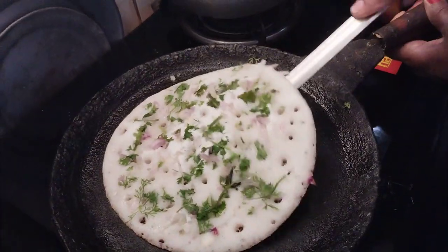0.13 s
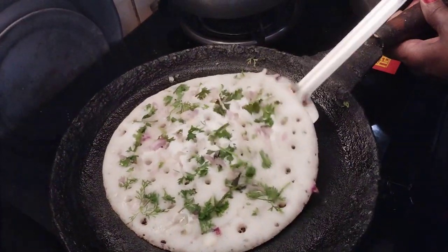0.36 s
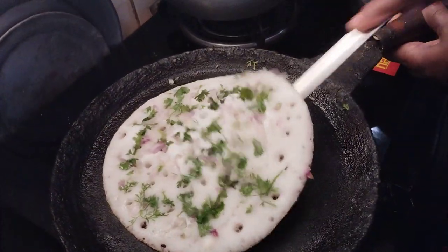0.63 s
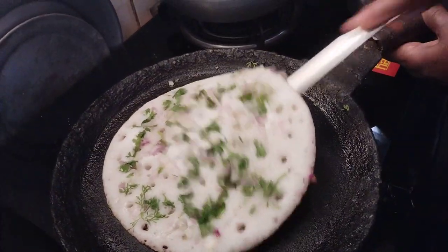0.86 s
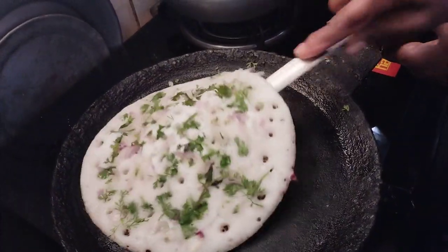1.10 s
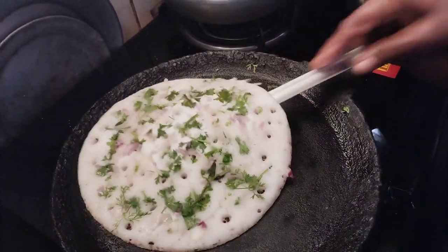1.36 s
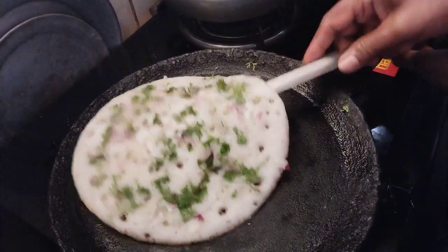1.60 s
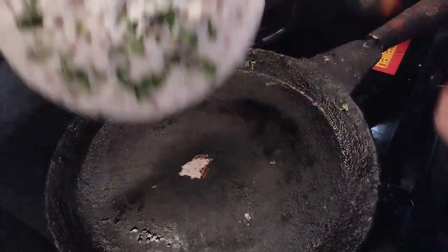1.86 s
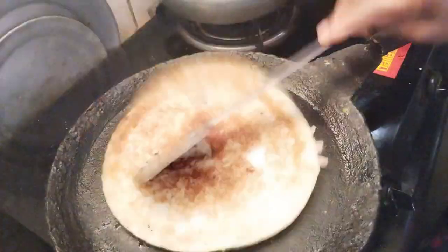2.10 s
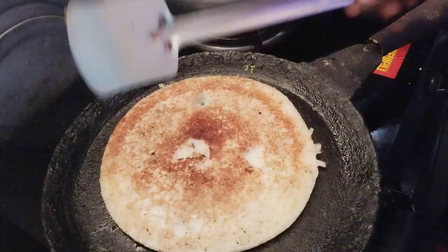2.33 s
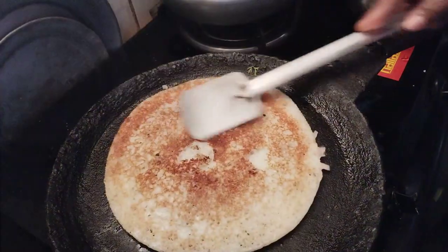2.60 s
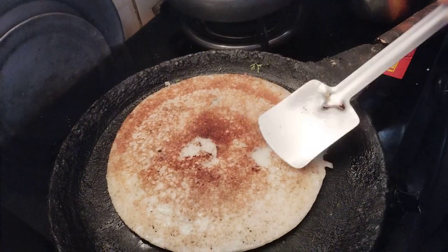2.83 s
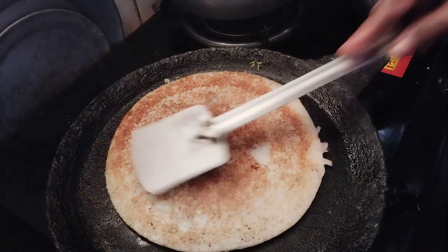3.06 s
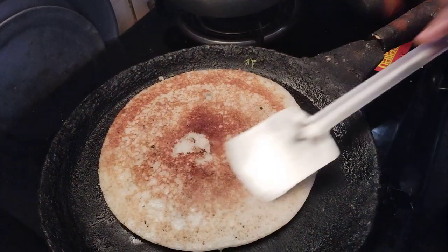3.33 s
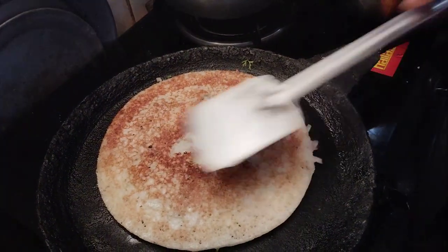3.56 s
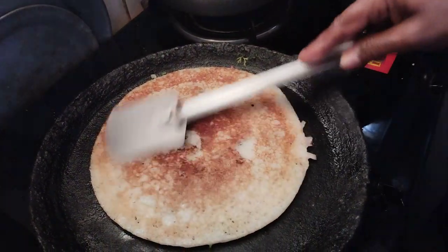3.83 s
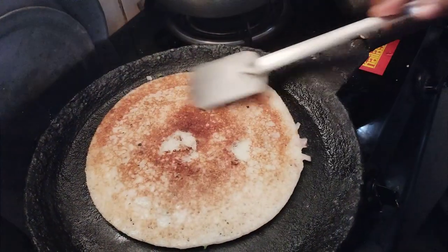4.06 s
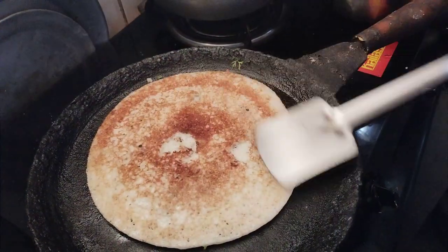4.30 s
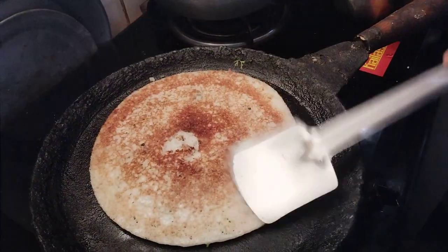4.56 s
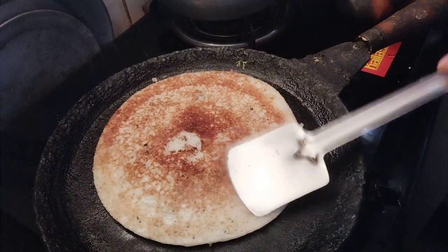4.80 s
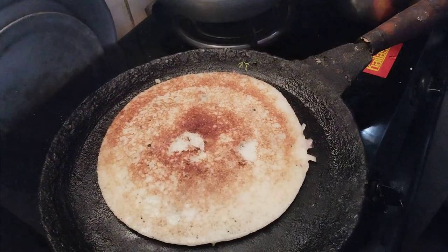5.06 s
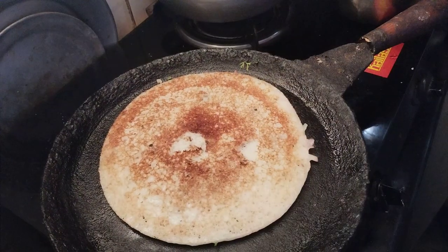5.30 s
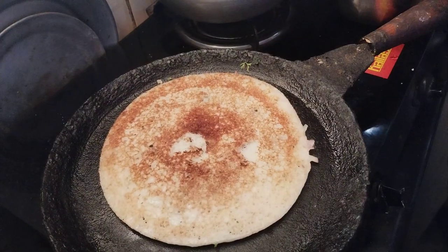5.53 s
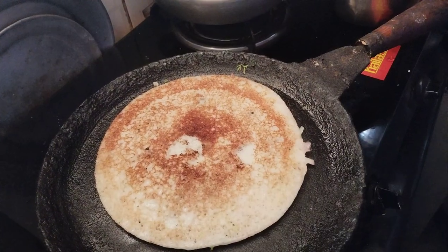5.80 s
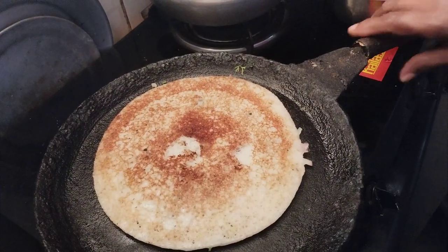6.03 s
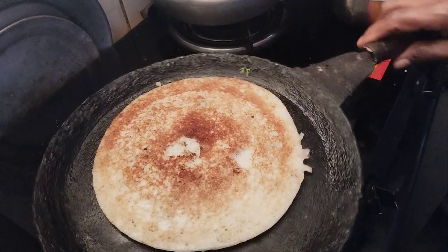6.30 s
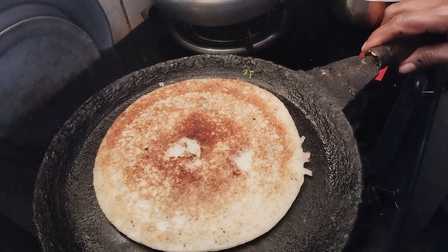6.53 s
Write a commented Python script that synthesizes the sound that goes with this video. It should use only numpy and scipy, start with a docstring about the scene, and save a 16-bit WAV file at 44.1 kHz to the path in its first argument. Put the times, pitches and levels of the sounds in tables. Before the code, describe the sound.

A metal spatula scrapes under a flatbread on an iron griddle, the bread slaps over and sizzles, then a clatter and short squeak.

```python
"""A spatula scrapes under a flatbread on a hot iron griddle (grit-driven modes) while fat spits (noise bursts)
and someone pounds steadily in a far room (ringing wall modes) over the low rumble of the kitchen (noise).
The bread is flipped: its wet side slaps down and starts to fry (hiss, fizz and crackle).
The spatula is then dropped on the counter (struck modes), and last the griddle squeaks as it is dragged
on the burner (a stick-slip tone with overtones)."""
import sys
import numpy as np
from scipy import signal
from scipy.fft import rfft, irfft
from scipy.io import wavfile

SR = 44100
rng = np.random.default_rng(int(sys.argv[2]) if len(sys.argv) > 2 else 0)


def wav_out(sig):
    """Save sig, one row per channel (or a flat mono array), as 16-bit PCM at SR to the path in sys.argv[1]."""
    wavfile.write(sys.argv[1], SR, np.round(np.clip(np.atleast_2d(sig).T, -1, 1) * 32767).astype(np.int16))


def how_loud(loudness_db):
    """Turn decibels into a plain amplitude multiplier (0 dB gives 1, 20 dB gives 10)."""
    steps = np.asarray(loudness_db, float) / 20
    return 10 ** steps


N = 293265
TIME_S = np.arange(N) / SR

# spectrum of the kitchen rumble: frequency_hz, density_db (per Hz)
RUMBLE_SPECTRUM = [(65, -29), (110, 1.5), (150, -18), (242, -4), (325, -8.5), (537, -9), (666, -13.5),
                   (1440, -10.5), (1710, -33), (1900, -31), (2470, -64), (4180, -120)]
# low swells of the house: centre_hz, width_hz, level_db (rms)
HOUSE_SWELLS = [(25.5, 6.8, -57), (48, 8.7, -53.5), (80, 19, -55.5), (205, 11, -66.5)]
RUMBLE_DB = -59  # rms

# far pounding: start_s, drive_db (relative)
POUNDS = [(0.305, -35), (0.721, -37.5), (1.14, -38.5), (1.578, -39.5), (2.012, -41), (2.515, -45.5),
          (2.954, -38.5), (3.395, -38), (3.853, -37), (4.286, -38.5), (4.73, -36), (5.161, -38.5),
          (5.597, -37.5), (6.058, -37), (6.495, -37)]
# modes of the wall: pitch_hz, gain_db, t60_s
WALL_MODES = [(244, 0.5, 0.069), (80, -5.5, 0.16), (341.3, -15, 0.27), (205, -18, 0.35)]

# soft low bumps, and the low ticks of two strong spits (2.358, 2.4414):
# start_s, level_db, pitch_hz, swell_s, t60_s
LOW_BUMPS = [(0.223, -23.5, 371, 0.011, 0.14), (1.21, -34.5, 403, 0.0068, 0.094),
             (1.25, -42, 395, .01, 0.21), (1.25, -44, 630, 0.013, .25), (2.169, -29, 210, .01, 0.44),
             (2.168, -29, 80, .004, 0.1), (2.17, -21, 643, 0.0017, 0.14),
             (2.358, -30, 403, 0.00051, 0.0081), (2.4414, -23, 450, 0.00027, 0.0064),
             (4.002, -38.5, 279, 0.012, 0.35), (4.053, -31, 297, 0.0024, 0.078),
             (4.099, -40, 205, 0.018, 0.36)]

# the griddle is dragged: time_s, squeak_db, overtone_db, rub_db
DRAG_CURVE = [(6.269, -85, -54, -54), (6.304, -30, -53, -44.5), (6.338, -26.5, -27, -44),
              (6.386, -22.5, -39, -38.5), (6.414, -26.5, -35.5, -43), (6.488, -28.5, -42, -48.5),
              (6.496, -34, -63, -53), (6.56, -58, -65, -55)]
# overtones of the squeak: multiple, level_db (against overtone_db)
SQUEAK_OVERTONES = [(2, -4.5), (3, -4), (4, 1), (5, -5), (6, -10), (7, -10)]
# spectrum of the griddle's rub on the burner: frequency_hz, density_db (per Hz)
RUB_SPECTRUM = [(88, -41), (150, -21), (247, -1), (325, -3.5), (661, -5), (963, -17), (1700, -28),
                (2210, -40), (3740, -120)]
# the pitch starts SQUEAK_START_HZ above SQUEAK_HZ and settles
SQUEAK_HZ, SQUEAK_START_HZ, SQUEAK_SETTLE_S = 1877, 35, 0.0297
OVERTONE_FADE_DB_PER_S = 12  # times the multiple: high overtones die first

# blows of the spatula, edge first, then flat with bounces: start_s, rattle_db, fall_db_per_s, click_db
SPATULA_BLOWS = [(5.471, -12, 424, 1.5), (5.675, -4.5, 520, 12), (5.721, -11.5, 300, 0.0),
                 (5.758, -22, 300, -10), (5.775, -21.5, 300, 2), (5.82, -25.5, 280, -4)]
# spatula modes: pitch_hz, width_hz, edge_db (edge touches first), flat_db (falls flat)
SPATULA_MODES = [(357, 92, -14, -20), (864, 96, 0, -6), (1840, 95, 1, -8), (2350, 63, -6, -24),
                 (3520, 90, -4, -7.5), (5070, 110, 5, -2), (6540, 110, -20, -7), (6490, 84, -10, 3),
                 (6700, 27, -14, -8), (7280, 38, 5, -1), (8060, 97, -3, 1.5), (8050, 45, -10, -1),
                 (8500, 69, -3, -1), (9100, 63, -17, -9), (9360, 110, -12, -5), (10270, 64, 3, -30),
                 (10200, 67, -5, -19), (11270, 150, 2.5, -4.5), (12700, 100, -2, -17), (12700, 60, -18, -4)]
# spectrum of the struck counter: frequency_hz, density_db (per Hz)
COUNTER_SPECTRUM = [(88, -46), (150, -17.5), (361, -5), (504, -10), (888, -8.5), (1630, -14), (2270, 2),
                    (2810, -10), (3490, -6.5), (8400, -2.5), (16000, -14.5)]
RATTLE_RISE_S, RATTLE_TAIL_DB, TAIL_FALL_DB_PER_S = 0.0012, -15.5, 140  # the slower tail of each rattle

# spectrum of the bread's slap: frequency_hz, density_db (per Hz)
SLAP_SPECTRUM = [(47, -44), (80, -1), (216, -1.5), (551, -3.5), (636, -9), (746, -9), (912, -1.5),
                 (2500, -15), (3250, -24), (5500, -120)]
SLAP_S, SLAP_DB, SLAP_HOLD_S, SLAP_FALL_DB_PER_S = 2.162, -27, 0.012, 194

# the clearest fat spits: start_s, strength_db (relative), deep_db (lower band against treble)
CLEAR_SPITS = [(0.0832, -19.5, 2.5), (0.4385, -29, -8), (0.1312, -15.5, 0), (0.7081, -16.5, -10),
               (0.767, -16.5, 0.5), (0.8678, -26, -6), (1.0834, -23, -15), (1.2456, -28, -2),
               (1.2733, -25, 1), (1.3705, -15.5, -0.5), (1.5138, -26.5, 0), (1.5656, -21, 0),
               (1.6545, -32, -6), (1.7047, -20, -2), (1.7425, -26, -10), (1.7774, -11.5, -10),
               (1.8665, -26, -12), (1.882, -30, -6), (1.9477, -25, -2.5), (1.9906, -22, -11),
               (2.0964, -28.5, -8), (2.1699, 6, 0), (2.2168, -5, -12), (2.232, -6, -10), (2.2587, -17, -11),
               (2.292, -11, 7), (2.3531, 0.5, -8), (2.3585, 0, -23), (2.4422, -0.5, -9), (2.4926, -18, -2),
               (2.537, -15.5, 2.5), (2.6386, -10, 1), (2.8831, -8, 1), (2.9942, -15, -2.5),
               (3.2761, -6, 0.5), (3.306, -13.5, 6), (3.545, -10, -10), (3.6283, -6.5, -10),
               (3.7239, -11, -14), (4.0228, -13, 2), (4.2176, -6.5, -12), (4.579, -10, -12),
               (4.7659, -11, -5), (4.8757, -5.5, -14), (5.0028, -10.5, -5), (5.1094, -20, 0),
               (5.4364, -13, -14), (6.099, -7.5, -3), (6.576, -18, -0.5), (6.6079, -13, -5),
               (6.643, -12, -6)]
CRACK_DB, CRACK_T60_S = -3.0, 0.0029  # crack against the spit's strength
# spray of a 0 dB spit, and the share of the spit's dB that it follows
SPRAY_DB, SPRAY_FOLLOWS, SPRAY_T60_S = -21.5, 0.62, 0.12
SMALL_SPITS, SMALL_OVER_FRY_DB, SMALL_SPREAD_DB = 30, 10, 5  # count, then strength
SMALL_DEEP_DB, SMALL_DEEP_SPREAD_DB = -8, 6.4

# crackle bands, tinted by the microphone: centre_hz, width_hz, level_db
CRACKLE_BANDS = [(2520, 590, -1.5), (4180, 3000, -7), (5720, 910, 1), (7900, 700, -6.5), (11300, 2100, 0),
                 (14000, 2300, -4)]
# vigour of the frying, which fades as the bread is lifted, flares as the wet side lands, then settles:
# time_s, level_db (relative), top_db (top octave against the rest)
FRY_CURVE = [(0, -43.5, -1), (1.0, -45.5, 5), (1.54, -50, 3), (2.159, -57, 8), (2.162, -21, -7),
             (2.168, -12.5, -9), (2.195, -25.5, 7), (2.24, -25.5, 9), (2.29, -20.5, 0.5), (2.36, -25.5, 5),
             (2.385, -29, 4), (2.44, -30, 2.5), (2.56, -26.5, 0), (2.77, -26.5, 0), (3.99, -28.5, -0.5),
             (4.8, -27.5, 1), (5.14, -31, 0.5), (5.46, -31.5, -1), (6.65, -33, 0.5)]
# spectrum of hiss and fizz: frequency_hz, density_db (per Hz)
FRY_SPECTRUM = [(530, -24.5), (900, -15.5), (1240, -14.5), (1370, -15.5), (1540, -10), (1720, -9),
                (2340, 1), (3320, -8.5), (5820, -4), (6880, -7), (8530, 0.5), (15700, -17)]
# the sizzle dips briefly: start_s, end_s, change_db
FRY_DIP = (2.45, 2.531, -12.0)

# blade strokes over the iron: peak_s, swell_s, fade_s, peak_db (relative),
# low_ring_db (against peak), dull_rub_db (against peak)
BLADE_STROKES = [(0.016, 0.092, 0.12, -33, -9, -5.5), (0.16, 0.084, 0.15, -27, -2, -8),
                 (0.325, 0.032, 0.11, -28, -6, -13), (0.512, 0.057, .11, -24, 2, -13),
                 (0.588, 0.049, 0.064, -26, -4.5, -14), (0.679, 0.057, 0.07, -28.5, -0.5, -18),
                 (0.81, 0.079, .05, -35.5, -1.5, -20), (0.94, 0.072, .08, -23.5, -1.5, -17),
                 (0.994, 0.096, 0.075, -18, -14, -35), (1.08, 0.067, 0.15, -39, -14, -19),
                 (1.27, 0.14, 0.098, -42, 0.5, -16), (1.45, 0.061, 0.059, -40.5, -7, -28)]
# modes of griddle and blade when scraped: pitch_hz, width_hz, level_db
GRIDDLE_MODES = [(644, 12, 1.5), (920, 18, -6.5), (1278, 25, -8.5), (1450, 53, -4), (2037, 33, -13),
                 (2420, 46, -4), (2520, 51, -8), (3800, 49, -10), (4670, 540, -8.5), (5350, 61, -5),
                 (7050, 64, -17), (7840, 68, -3.5), (8290, 160, -1), (9000, 72, -7), (9000, 57, -6.5),
                 (9800, 54, -5.5), (11500, 400, -8)]
# spectrum of the blade's rasp: frequency_hz, density_db (per Hz)
RASP_SPECTRUM = [(88, -52), (150, -22), (524, -19), (637, -11.5), (837, -8), (941, 4), (1140, -4.5),
                 (2550, -2), (4000, -15), (8070, -5), (16000, -13)]
# the blade sings on one mode: start_s, length_s, pitch_hz, level_db (rms before the swell)
BLADE_SINGS = [(0.48, 0.17, 2520, -44), (0.905, 0.11, 2520, -27), (0.928, 0.14, 1450, -31.5),
               (0.971, 0.031, 5350, -21), (0.977, 0.068, 8300, -30), (.98, 0.044, 8950, -26),
               (0.962, 0.074, 3800, -32.5), (1.033, 0.13, 1104, -45), (1.1, 0.29, 2510, -61),
               (1.358, .16, 4280, -52)]
# fall from the peak after one swell or fade time, power of the slope
STROKE_EDGE_DB, STROKE_ROUNDNESS = 22, 1.3
RING_DB = -0.5  # high modes against rasp


def rms_one(x):
    """Normalisation: scaling a signal to unit rms."""
    return x / np.sqrt(np.mean(x ** 2) + 1e-20)


def in_time(rows):
    """Linear interpolation: the columns of a curve table, one value a sample."""
    s, *columns = np.transpose(rows)
    return [np.interp(TIME_S, s, column) for column in columns]


def colour(x, points):
    """Minimum phase: a folded cepstrum gives the causal filter that follows a spectrum table."""
    hz, db = np.transpose(points)
    grid_hz = np.maximum(np.arange(4097) * SR / 8192, 1)
    gain_db = np.interp(np.log(grid_hz), np.log(hz), db)
    cepstrum = irfft(np.log(how_loud(gain_db)))
    cepstrum[1:4096] *= 2
    cepstrum[4097:] = 0
    impulse = irfft(np.exp(rfft(cepstrum)))
    return signal.fftconvolve(x, impulse)[:N]


def drift(rate_hz):
    """Low-passed noise: a slow random wander of spread 1."""
    r = np.exp(-40 * np.pi * rate_hz / SR)  # runs at one value per 20 samples
    white = rng.standard_normal(N // 20 + 3002)
    slow = signal.lfilter([1], [1, -2 * r, r * r], white)[3000:]  # the start-up is cut off
    return np.interp(np.arange(N) / 20, np.arange(len(slow)), rms_one(slow - slow.mean()))


def resonance(x, hz, width_hz):
    """Damped oscillator: a two-pole band with gain 1 on top."""
    r = np.exp(-np.pi * width_hz / SR)
    poles = [1, -2 * r * np.cos(2 * np.pi * hz / SR), r * r]
    return signal.lfilter([(1 - r * r) / 2, 0, (r * r - 1) / 2], poles, x + 1e-18)


def ring(clicks, hz, t60_s):
    """Free decay: a unit click sets a decaying sine ringing."""
    r = how_loud(-60 / (t60_s * SR))
    w = 2 * np.pi * hz / SR
    return signal.lfilter([0, np.sin(w)], [1, -2 * r * np.cos(w), r * r], clicks + 1e-18)


def grains(per_s, spread_db):
    """Poisson-like impacts: random clicks of uneven size and sign, scaled to rms 1."""
    excess = np.minimum(rng.exponential(1, N), 5)
    sizes = how_loud(spread_db * excess) * rng.choice([-1, 1], N)
    return rms_one(sizes * (rng.random(N) < per_s / SR))


def body(x, modes, wander_db):
    """Modal superposition: the shifting contact point changes how strongly each mode is driven."""
    total = 0
    for k, (hz, width_hz, db) in enumerate(modes):
        drive = (-1) ** k * how_loud(db + wander_db * drift(5.5))
        total = total + drive * resonance(x, hz, width_hz) / np.sqrt(width_hz)
    return total


def rumble():
    """Filtered noise: broad room noise with a few narrow low swells."""
    white = rng.standard_normal((2, N))
    out = how_loud(RUMBLE_DB) * rms_one(colour(white[0], RUMBLE_SPECTRUM))
    for hz, width_hz, db in HOUSE_SWELLS:
        narrow = resonance(white[1], hz, width_hz)
        out += how_loud(db) * rms_one(resonance(narrow, hz, 2 * width_hz))
    return out


def pounding():
    """Transmission through a wall: blows alike but for level, low-passed, set the wall modes ringing."""
    clicks = np.zeros(N)
    for s, db in POUNDS:
        clicks[round(s * SR)] = -how_loud(db + 5.0)
    soft = signal.sosfilt(signal.butter(4, 420, fs=SR, output="sos"), clicks)
    return sum(how_loud(db) * ring(soft, hz, t60_s) for hz, db, t60_s in WALL_MODES)


def kitchen(x, t60_s=0.19):
    """Diffuse reverberation: decaying noise gives the dulled echo of the small hard room."""
    t = np.arange(round(0.5 * SR)) / SR
    tail = rng.standard_normal(len(t)) * how_loud(-60 * t / t60_s) * (t > 0.004)
    tail = signal.lfilter([1, 0.6], [1], tail)
    return signal.fftconvolve(x, tail / np.sqrt(np.sum(tail ** 2)))[:N]


def bumps():
    """Damped oscillation: a low ring swells for a moment and decays exponentially."""
    out = np.zeros(N)
    t = np.arange(SR) / SR
    for s, db, hz, swell_s, t60_s in LOW_BUMPS:
        i = round(s * SR)
        envelope = (1 - np.exp(-t / swell_s)) * how_loud(db - 60 * t / t60_s)
        tone = np.sin(2 * np.pi * (hz * t + rng.random()))
        out[i:i + SR] += (envelope * tone)[:N - i]
    return out


def drag():
    """Stick-slip friction locks onto one mode: a rough tone with overtones, on a rub that stirs the griddle."""
    start_s, end_s = DRAG_CURVE[0][0], DRAG_CURVE[-1][0]
    before = [(start_s - 0.03, -100, -100, -100)]
    after = [(end_s + 0.04, -100, -100, -100)]
    squeak_db, overtone_db, rub_db = in_time(before + list(DRAG_CURVE) + after)
    settling = np.exp(-np.maximum(TIME_S - start_s, 0) / SQUEAK_SETTLE_S)
    hz = SQUEAK_HZ + SQUEAK_START_HZ * settling
    phase = 2 * np.pi * np.cumsum(hz + 7 * drift(60)) / SR
    tone = np.sqrt(2) * how_loud(1.5 * drift(70)) * np.sin(phase)
    fading_db = OVERTONE_FADE_DB_PER_S * np.clip(TIME_S - DRAG_CURVE[2][0], 0, 1)
    overtones = np.zeros(N)
    for k, db in SQUEAK_OVERTONES:
        level = how_loud(db - k * fading_db + 4.5 * drift(60))
        overtones += np.sqrt(2) * level * np.sin(k * phase + 0.6 * drift(150))
    grit = grains(5000, spread_db=2.5)
    # two more griddle modes, shaken by the grit of the rub
    side = how_loud(2.5) * rms_one(resonance(grit, 2130, 220)) + how_loud(1.5) * rms_one(resonance(grit, 7970, 80))
    rub = rms_one(colour(grit, RUB_SPECTRUM))
    return how_loud(squeak_db) * tone + how_loud(overtone_db) * (overtones + side) + how_loud(rub_db) * rub


def clatter():
    """Impact excitation: hard blows and the rattle after them drive the spatula's modes and the counter."""
    rattle, clicks = np.zeros(N), np.zeros(N)
    for s, db, fall_db_per_s, click_db in SPATULA_BLOWS:
        i = round(s * SR)
        t = np.arange(N - i) / SR
        decay = how_loud(-fall_db_per_s * t) + how_loud(RATTLE_TAIL_DB - TAIL_FALL_DB_PER_S * t)
        rattle[i:] += (1 - np.exp(-t / RATTLE_RISE_S)) * how_loud(db) * decay
        clicks[i] = how_loud(click_db)
    contact = rattle * grains(8000, spread_db=2.8) + clicks
    flat = TIME_S > 5.62  # from edge contact to lying flat
    modes = np.zeros(N)
    for k, (hz, width_hz, edge_db, flat_db) in enumerate(SPATULA_MODES):
        drive = how_loud(np.where(flat, flat_db + 3.3 * drift(29), edge_db)) * contact
        modes += (-1) ** k * resonance(drive, hz, width_hz) / np.sqrt(width_hz)
    return how_loud(28.0) * modes + how_loud(5.0) * colour(contact, COUNTER_SPECTRUM)


def slap():
    """Air displacement: the soft bread smacks the iron with a dull burst of pushed air."""
    t = TIME_S - SLAP_S
    burst = (t > 0) * how_loud(SLAP_DB - SLAP_FALL_DB_PER_S * np.maximum(t - SLAP_HOLD_S, 0))
    return burst * rms_one(colour(grains(6000, spread_db=1.0), SLAP_SPECTRUM))


def spits():
    """Explosive boiling: a droplet bursts with a sharp crack and a spray of steam that dies away."""
    bright, deep, noise = np.zeros(N), np.zeros(N), rng.standard_normal(N)
    t = np.arange(round(0.2 * SR)) / SR
    # small spits come at random, their strength following the frying
    when_s = rng.random(SMALL_SPITS) * N / SR
    fry_db = in_time(FRY_CURVE)[0][(when_s * SR).astype(int)]
    small_db = fry_db + SMALL_OVER_FRY_DB + SMALL_SPREAD_DB * rng.standard_normal(SMALL_SPITS)
    small_deep_db = SMALL_DEEP_DB + SMALL_DEEP_SPREAD_DB * rng.standard_normal(SMALL_SPITS)
    for s, db, deep_db in list(CLEAR_SPITS) + list(zip(when_s, small_db, small_deep_db)):
        i = min(round(s * SR), N - 1)
        piece = noise[i:i + len(t)]
        crack = how_loud(db + CRACK_DB - 60 * t / CRACK_T60_S)[:N - i] * np.sign(piece)
        spray = how_loud(SPRAY_DB + SPRAY_FOLLOWS * db - 60 * t / SPRAY_T60_S)[:N - i] * piece
        bright[i:i + len(t)] += crack + spray
        deep[i:i + len(t)] += how_loud(deep_db) * (crack + spray)
    bright = signal.sosfilt(signal.butter(2, [5000, 14500], "band", fs=SR, output="sos"), bright)
    deep = signal.sosfilt(signal.butter(3, [1900, 6500], "band", fs=SR, output="sos"), deep)
    bright += how_loud(3.0) * resonance(bright, 8570, 1070)
    deep += how_loud(-3) * resonance(deep, 2400, 380) + how_loud(8.0) * resonance(deep, 5960, 610)
    return bright + deep


def crackle():
    """Band-filtered impulses: clumped clicks, each sent at random through one of a few bands."""
    clicks = grains(1200 * how_loud(4.0 * drift(25)), spread_db=3.0)
    dealt = rng.integers(0, len(CRACKLE_BANDS), N)
    total = np.zeros(N)
    for k, (hz, width_hz, db) in enumerate(CRACKLE_BANDS):
        total += how_loud(db) * rms_one(resonance(clicks * (dealt == k), hz, width_hz))
    return rms_one(total)


def frying():
    """Boiling noise: coloured steam hiss and fine fizz, joined by clumped crackle."""
    fry_db, top_db = in_time(FRY_CURVE)
    dip_start_s, dip_end_s, change_db = FRY_DIP
    dip_db, = in_time([(dip_start_s - 0.01, 0), (dip_start_s + 0.005, change_db),
                       (dip_end_s, change_db), (dip_end_s + 0.005, 0)])
    hiss = how_loud(-0.5 + 2.8 * drift(13.6)) * rng.standard_normal(N)
    fizz = how_loud(0.5) * grains(7000 * how_loud(2.5 * drift(30)), spread_db=4.0)
    sound = rms_one(colour(hiss + fizz, FRY_SPECTRUM)) + how_loud(-5.5) * crackle()
    deep = signal.sosfilt(signal.butter(2, 4000, fs=SR, output="sos"), sound)
    below_top = signal.sosfilt(signal.butter(2, 9500, fs=SR, output="sos"), sound)
    # larger bubbles come and go apart from the fine ones; the top follows its own curve
    mix = how_loud(1.6 * drift(1.7)) * deep
    mix += how_loud(0.63 * drift(4.9)) * (below_top - deep)
    mix += how_loud(top_db) * (sound - below_top)
    return how_loud(fry_db + dip_db - 2.5) * mix


def strokes():
    """Power summation: strokes swell and fade, summed into gains of the bright, low and dull parts."""
    peak_s, swell_s, fade_s, db, low_db, dull_db = np.transpose(BLADE_STROKES)[:, :, None]
    coarse = np.arange(0, N, 32)
    t = coarse / SR - peak_s
    distance = np.where(t < 0, -t / swell_s, t / fade_s)
    shape_db = db - STROKE_EDGE_DB * distance ** STROKE_ROUNDNESS
    gains = []
    for part_db in (0, low_db, dull_db):
        power = np.sum(how_loud(np.maximum(shape_db + part_db, -200)) ** 2, axis=0)
        gains.append(np.interp(np.arange(N), coarse, np.sqrt(power)))
    return gains


def scrape():
    """Sliding friction: dense grit under the blade drives a rasp, the iron's modes and the pan's dull rub."""
    bright_gain, low_gain, dull_gain = strokes()
    grit = grains(6000 * how_loud(5.0 * drift(40)), spread_db=3.5)
    rasp = rms_one(colour(grit, RASP_SPECTRUM))
    high = rms_one(body(grit, [m for m in GRIDDLE_MODES if m[0] > 1700], wander_db=4.0))
    low = rms_one(body(grit, [m for m in GRIDDLE_MODES if m[0] < 1700], wander_db=2.5))
    # the pan rubs on its stand
    dull = resonance(grit, 212, 40) + how_loud(-1.5) * resonance(grit, 292, 74) + how_loud(-1) * resonance(grit, 470, 180)
    out = how_loud(-2.0) * bright_gain * (rasp + how_loud(RING_DB) * high)
    out += how_loud(-4.5) * low_gain * low
    out += how_loud(-1.0) * dull_gain * rms_one(dull)
    for s, length_s, hz, db in BLADE_SINGS:
        swell = np.sin(np.pi * np.clip((TIME_S - s) / length_s, 0, 1))
        out += how_loud(db) * rms_one(resonance(grit, hz, 8 + hz / 130)) * swell
    return out


def scene():
    """Superposition: everything at the stove shares the room; rumble and pounding come from outside."""
    stove = scrape() + frying() + slap() + spits() + clatter() + drag() + bumps()
    return (stove + how_loud(-14.5) * kitchen(stove) + pounding() + rumble())[None]


def band_limit(x):
    """A steep low-pass at the top of the band."""
    return signal.sosfilt(signal.butter(12, 16390, fs=SR, output="sos"), x)


def record(dry):
    """Saturation and band-limiting: peaks are rounded off and the top is cut."""
    rounded = 1.24 * np.tanh(dry / 1.149)
    finished = signal.sosfilt(signal.cheby2(10, 50, 16700, fs=SR, output="sos"), rounded)
    return band_limit(finished)


dry = scene()
out = record(dry)
wav_out(out)
```